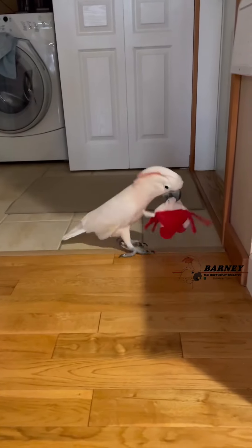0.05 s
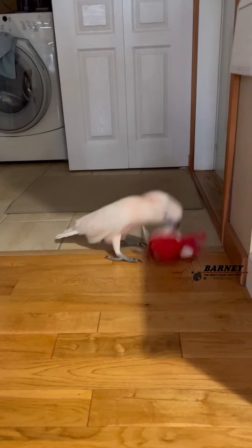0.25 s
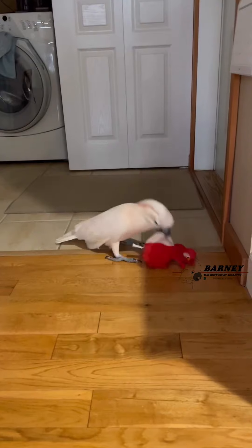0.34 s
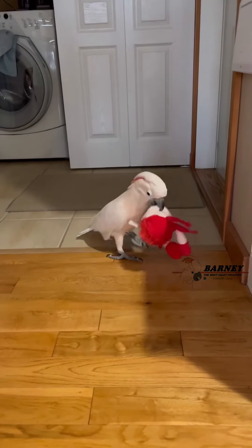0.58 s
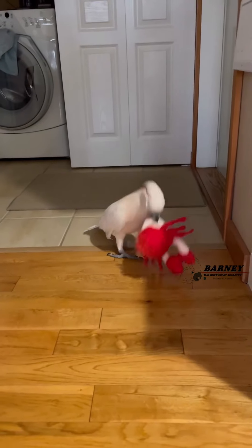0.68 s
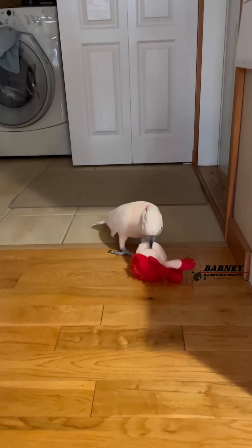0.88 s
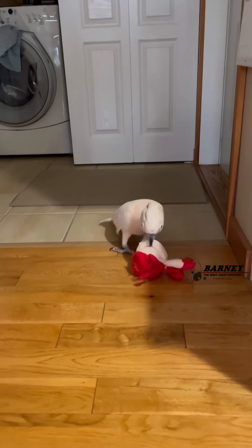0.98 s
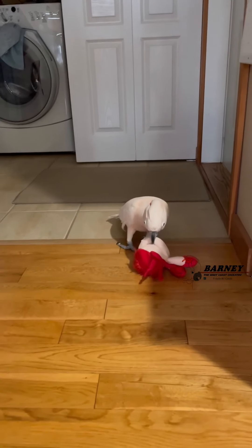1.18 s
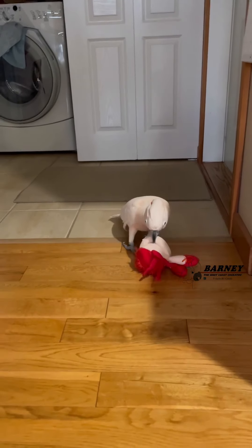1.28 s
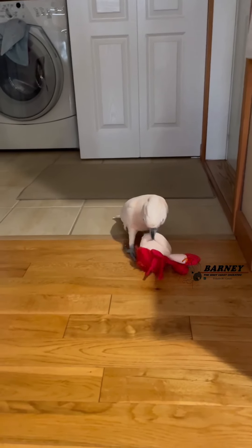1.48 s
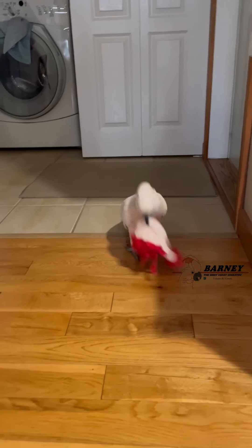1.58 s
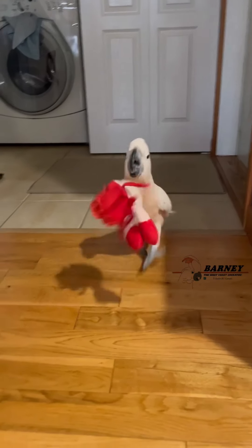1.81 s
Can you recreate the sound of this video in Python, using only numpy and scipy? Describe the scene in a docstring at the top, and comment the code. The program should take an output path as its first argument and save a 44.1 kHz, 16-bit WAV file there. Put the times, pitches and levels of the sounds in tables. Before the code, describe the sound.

A plush toy swung by a bird thumps twice on a hardwood floor. After tiny squeaks and rustling in the first 0.2 seconds, it lands with a loud crack and short boom at 0.25. Ticks precede a softer, duller hit at 0.8. From 1.1 to 1.8 seconds come faint low bumps and beak and claw scuffs, ending in a barely audible squeak. A low room hum lies underneath.

```python
"""A plush toy, swung down twice by a cockatoo, strikes a hardwood floor in a small room.
Each impact excites the damped modes of the boards: a hard part of the toy cracks and the floor booms.
A few tiny squeaks come first; beak and claws tick and scuff on the toy, and plush and feathers rustle.
Near the end the bird shifts its weight with soft bumps and lifts the toy with a faint squeak.
A low room hum and a deep rumble lie underneath."""
import sys
import numpy as np
from scipy import signal
from scipy.fft import rfft, irfft, next_fast_len
from scipy.io import wavfile
from scipy.ndimage import map_coordinates

SR = 44100
rng = np.random.default_rng(int(sys.argv[2]) if len(sys.argv) > 2 else 0)


def put_to_file(sound):
    """Save the sound as 16-bit audio at rate SR, in the file named by the first command-line argument."""
    columns = np.atleast_2d(sound).T  # one column per channel
    safe = np.clip(columns, -1, 1)
    whole_steps = np.round(safe * 32767)
    wavfile.write(sys.argv[1], SR, whole_steps.astype(np.int16))


N = 81585


def amp(db):
    """Amplitude ratio of a level in decibels."""
    return 10 ** (np.asarray(db) / 20)


def unit(x):
    """Normalisation to rms 1."""
    return x / np.sqrt(np.mean(x ** 2) + 1e-20)


def along(points, hz):
    """Interpolation of (f/Hz, value) points on a logarithmic frequency axis."""
    f, v = np.transpose(points)
    return np.interp(np.log(hz + 1), np.log(f + 1), v)


def since(s):
    """Time in seconds since the instant s, for every sample."""
    return np.arange(N) / SR - s


def curve(rows):
    """Linear interpolation of (t/s, value) points, for every sample."""
    return np.interp(since(0), *np.transpose(rows))


def wobble(rate):
    """Random modulation: a spline through rate Gaussian values a second."""
    return map_coordinates(rng.standard_normal(N // 8), [np.arange(N) * rate / SR], mode="wrap")


def filtered(x, response):
    """Linear filtering: the spectrum of x times a frequency response."""
    size = next_fast_len(N + SR // 4)
    return irfft(rfft(x, size) * response(np.fft.rfftfreq(size, 1 / SR)), size)[..., :N]


def noise(colour_db):
    """Coloured noise of rms 1; colour_db gives the relative level at each frequency."""
    return unit(filtered(rng.standard_normal(N), lambda hz: amp(colour_db(hz))))


def diffuse(colour):
    """Diffuse field: stereo noise of rms 1, most alike in both channels at long wavelengths."""
    # side level relative to mid (f/Hz, level/dB)
    width = [(100, -30), (200, -19), (380, -14), (700, -6), (2000, -6), (5000, -5), (12000, -6)]
    response = lambda hz: amp([along(colour, hz), along(colour, hz) + along(width, hz)])
    mid, side = filtered(rng.standard_normal((2, N)), response)
    return unit(np.array([mid + side, mid - side]))


def in_room(x, room_db):
    """Reverberation: early reflections and an exponentially decaying tail follow the direct sound."""
    # reverberation time (f/Hz, T60/s)
    room_t60 = [(80, 0.81), (300, 0.81), (800, 0.69), (2500, 0.47), (5000, 0.53), (8000, 0.33),
                (13000, 0.11)]
    build_s, early_db, early_t60_s = 0.0028, 9, 0.12
    field = diffuse([(1, 0), (SR, 0)])[:, :SR * 3 // 4]
    hz, t, spectra = signal.stft(field, SR, nperseg=256)
    decay = amp(-60 * t / along(room_t60, hz)[:, None]) + amp(early_db - 60 * t / early_t60_s)
    tail = signal.istft(spectra * decay, SR, nperseg=256)[1]
    tail *= 1 - np.exp(-(np.arange(tail.shape[1]) / SR / build_s) ** 2)
    tail /= np.linalg.norm(tail[0])
    return x + amp(room_db) * signal.fftconvolve(np.atleast_2d(x), tail, axes=1)[:, :N]


def burst(s, rise, t60):
    """Transient envelope: a Gaussian rise to the peak at s, then exponential decay."""
    t = since(s)
    return np.exp(-(np.minimum(t, 0) / rise) ** 2) * amp(-60 * np.maximum(t, 0) / t60)


def background():
    """Ambient noise in a diffuse field: a steady room hum and a deep rumble that comes and goes."""
    # spectra of hum and rumble (f/Hz, relative level/dB)
    hum_colour = [(30, -37), (70, -2.5), (100, 4.5), (150, -8.5), (220, -5), (340, -3.5), (520, -14.5),
                  (1000, -19.5), (2500, -37.5), (6000, -45), (9000, -47.5), (12500, -54), (16000, -62)]
    rumble_colour = [(15, -33), (35, -20.5), (52, -6), (90, -6.5), (130, -21), (300, -29), (1000, -83.5)]
    # envelope of the rumble (t/s, level/dB)
    rumble_levels = [(0, -63), (.3, -55), (.58, -49), (.7, -60), (.9, -49), (1.05, -65), (1.12, -49),
                     (1.2, -49), (1.29, -59.5), (1.55, -62.5), (1.72, -59), (1.77, -49), (1.84, -46)]
    hum_db = -54.5
    return amp(hum_db) * diffuse(hum_colour) + amp(curve(rumble_levels)) * diffuse(rumble_colour)


def rustle():
    """Friction noise of plush and feathers, made grainy by random amplitude modulation."""
    # envelopes of the rustle and of the thin, high feather hiss (t/s, level/dB)
    rustle_levels = [(0, -43.5), (.08, -46.5), (.13, -50.5), (.2, -49.5), (.26, -37), (.5, -63), (.54, -55),
                     (.6, -63), (.72, -53.5), (.95, -62), (1.22, -69.5), (1.4, -59), (1.6, -66),
                     (1.85, -65)]
    hiss_levels = [(0, -68.5), (.9, -76), (1.25, -83), (1.3, -69), (1.42, -77.5), (1.55, -70.5),
                   (1.67, -67.5), (1.85, -73.5)]
    # their spectra (f/Hz, relative level/dB)
    rustle_colour = [(200, 13.5), (600, 6.5), (1400, 0), (2600, 4.5), (4000, -1.5), (6200, -4), (8500, -20),
                     (12500, -33), (16000, -32.5)]
    hiss_colour = [(2000, -16), (6000, 6), (9000, -9.5), (13000, 3), (16000, -12)]
    grain_db, grains_per_s = 1.5, 360
    grainy = lambda colour: unit(diffuse(colour) * amp(grain_db * wobble(grains_per_s)))
    rustling = amp(curve(rustle_levels)) * grainy(rustle_colour)
    hiss = amp(curve(hiss_levels)) * grainy(hiss_colour)
    return rustling + hiss


def squeaks():
    """Tiny squeaks: a tone and its second harmonic, roughened by frequency jitter and a noisy rasp."""
    # squeaks (peak t/s, rise/s, f/Hz, glide/(octave/s), level/dB)
    events = [(.012, 0.0068, 3720, 0, -40.5), (.013, 0.0027, 5800, 0.5, -43),
              (.018, 0.019, 2560, -0.5, -43), (.051, 0.0045, 3020, -0.5, -34.5),
              (.077, 0.0092, 2980, 9.5, -35), (.161, .007, 3260, -16.5, -37.5),
              (.188, 0.0043, 3346, 6.5, -38)]
    # spectrum of the rasp (f/Hz, relative level/dB)
    rasp_colour = [(500, -26.5), (1600, -17.5), (2300, 1), (3500, -12), (4500, -10), (6200, -12),
                   (8000, -23.5), (15000, -44)]
    jitter_fraction, jitter_per_s = .062, 1300
    overtone_db, rasp_db = -19.5, -7
    out = np.zeros(N)
    for s, rise, hz, glide, db in events:
        t = np.clip(since(s), -4 * rise, rise)  # the pitch glides only around the peak
        pitch = hz * 2 ** (glide * t) * (1 + jitter_fraction * wobble(jitter_per_s))
        phase = 2 * np.pi * np.cumsum(pitch) / SR
        tone = np.sqrt(2) * (np.sin(phase) + amp(overtone_db) * np.sin(2 * phase))
        rasp = amp(rasp_db) * noise(lambda f: along(rasp_colour, f))
        out += amp(db) * burst(s, rise, t60=.016) * (tone + rasp)
    return in_room(out, room_db=-10)


def clicks():
    """Impulsive excitation: brief, hard contacts of beak and toy radiate broadband cracks."""
    # contacts (t/s, level/dB, T60/s, tilt above 300 Hz/(dB/octave))
    contacts = [(0.0235, -36, 0.0067, 0.5), (0.175, -38.5, 0.016, 2), (0.185, -34, 0.034, 2),
                (0.19, -45, 0.011, -5), (0.2213, -30, 0.014, 10), (0.2453, -14.5, 0.033, -2),
                (0.2503, -15.5, 0.019, 8.5), (0.6526, -37.5, 0.053, 6), (.659, -35.5, 0.066, -1.5),
                (0.733, -44, 0.0093, 4), (.7935, -35, 0.027, -3.5), (0.8052, -29.5, 0.014, -0.5),
                (0.8143, -34.5, 0.047, -3.5), (1.2842, -46.5, 0.034, -3)]
    # spectrum of a crack before the tilt (f/Hz, relative level/dB)
    colour = [(150, -26), (500, -2), (1100, 1.5), (2000, -3), (3000, 1.5), (5300, -5), (7000, -3.5),
              (9500, -20.5), (12000, -6), (16000, -34)]
    out = np.zeros(N)
    for s, db, t60, tilt in contacts:
        crack = noise(lambda hz: along(colour, hz) + tilt * np.log2(np.maximum(hz, 300)))
        out += amp(db) * burst(s, rise=0.00011, t60=t60) * crack
    return in_room(out, room_db=-6)


def scuffs():
    """Resonant filtering: each rub or snap of beak, claws and toy is noise in one broad resonance."""
    # rubs and snaps (t/s, level/dB, rise/s, T60/s, centre f/Hz, half-width/octave)
    rubs = [(0.2237, -33.5, 0.0012, 0.012, 668, 0.22), (0.238, -37.5, 0.0065, .03, 650, 0.29),
            (0.2459, -19.5, 0.00038, 0.022, 1148, 0.27), (.251, -23.5, 0.00083, .03, 5210, 0.17),
            (.805, -26.5, 0.00053, 0.019, 4970, 0.59), (1.412, -59, 0.0055, .05, 2920, 0.36),
            (1.425, -40, 0.00042, 0.014, 1510, 0.43), (1.458, -50, 0.0014, 0.019, 7000, .35),
            (1.572, -57, 0.0017, 0.018, 11400, 0.25), (1.652, -60, 0.0018, 0.016, 12100, .3),
            (1.681, -50.5, 0.0086, 0.075, 2690, 0.64), (1.686, -53, 0.0087, 0.07, 1220, 0.23)]
    out = np.zeros(N)
    for s, db, rise, t60, centre, width in rubs:
        rub = noise(lambda hz: -20 * np.log10(1 + (np.log2((hz + 1) / centre) / width) ** 4 / 2))
        out += amp(db) * burst(s, rise, t60) * rub
    return in_room(out, room_db=-7)


def thumps():
    """Modal vibration: each landing of the toy rings the boards, then the wider floor booms."""
    # landings, the softer one duller (t/s, level/dB, tilt about 200 Hz/(dB/octave))
    landings = [(.2462, -7, -0.5), (0.7971, -24.5, -8)]
    # floorboard modes (f/Hz, relative level/dB, T60/s)
    modes = [(74.4, -23, 0.4), (99.8, -7.5, 0.29), (140, -1.5, 0.076), (196.3, 0, 0.093),
             (256, -11.5, 0.099), (300, 3.5, 0.13), (352.5, -26, 0.55), (388.5, -2.5, 0.083),
             (552, -13, 0.1), (610, -9.5, 0.055), (695, -4.5, 0.061), (952, -15, .09), (1123, -17.5, 0.11),
             (1250, -17, 0.064), (1316, -17.5, 0.064), (1520, -23.5, 0.077)]
    # spectrum of the boom before the tilt (f/Hz, relative level/dB)
    boom_colour = [(25, -24.5), (60, -3.5), (100, -1), (150, -7), (210, -2.5), (290, 4.5), (400, -8),
                   (550, -16), (1000, -22), (3000, -52.5)]
    attack_s, spread_rad, full_spread_hz = 0.0032, .25, 450
    boom_db, boom_delay_s, boom_t60_s = -14, 0.012, 0.48
    left_right = np.array([[1], [-1]])
    out = np.zeros((2, N))
    for s, db, tilt in landings:
        t = np.maximum(since(s), 0)
        ring = 0
        for k, (hz, level, t60) in enumerate(modes):
            # a phase difference between the channels gives each mode its own direction
            phase = spread_rad * min(hz / full_spread_hz, 1) * rng.standard_normal() * left_right
            decay = amp(level + tilt * np.log2(hz / 200) - 60 * t / t60)
            polarity = (-1) ** k  # neighbouring modes swing opposite ways
            ring += polarity * decay * np.sin(2 * np.pi * hz * t + phase)
        ring *= amp(db) * (1 - np.exp(-t / attack_s))
        boom = diffuse([(hz, level + tilt * np.log2(hz / 200)) for hz, level in boom_colour])
        boom *= amp(db + boom_db) * burst(s + boom_delay_s, boom_delay_s / 2, boom_t60_s)
        out += in_room(ring, room_db=-14.5) + boom
    return out


def bumps():
    """Slow forcing: soft pushes excite only the lowest resonance of the floor."""
    # the bird shifts its weight and lifts the toy (t/s, level/dB)
    pushes = [(1.11, -46), (1.18, -43), (1.78, -50), (1.825, -40.5)]
    floor_hz = 53.9
    return sum(amp(db) * burst(s, rise=0.0092, t60=0.21) * np.sin(2 * np.pi * floor_hz * since(s))
               for s, db in pushes)


def lift_squeak():
    """A pure tone under a Gaussian envelope: the faint, thin squeak as the toy is lifted."""
    peak_s, half_width_s, pitch_hz, level_db = 1.795, 0.022, 3540, -68
    t = since(peak_s)
    return amp(level_db) * np.exp(-(t / half_width_s) ** 2) * np.sin(2 * np.pi * pitch_hz * t)


def scene():
    """Superposition: the sound pressures of floor, toy, bird and room add."""
    return thumps() + bumps() + clicks() + scuffs() + squeaks() + lift_squeak() + rustle() + background()


def record(dry):
    """Stereo pickup: two ports differ in level and phase; low cut, saturation and band limit follow."""
    # left port minus right port (f/Hz, level/dB)
    balance = [(60, 0), (110, .5), (200, 1.5), (650, 1.8), (1200, -2.4), (2400, 0), (4400, -1), (8000, 0)]
    # lead of the left port over the right (f/Hz, phase/rad)
    lead = [(100, 0), (5000, .1), (6800, 1.4), (8200, 2.7), (9500, 3.14), (10800, 3.5), (12400, 5.1),
            (14300, 6.3)]
    low_cut_hz, top_hz, ceiling = 23, 16400, .95

    def response(hz):
        """Transfer function: each port takes half of the difference, then a first-order high-pass."""
        gain = amp(np.outer([.5, -.5], along(balance, hz)))
        phase = np.outer([.5, -.5], along(lead, hz))
        return gain * np.exp(1j * phase) * 1j * hz / (1j * hz + low_cut_hz)

    x = filtered(dry, response)
    x = x / (1 + np.abs(x / ceiling) ** 6) ** (1 / 6)  # soft clipping
    return filtered(x, lambda hz: hz < top_hz)


dry = scene()
out = record(dry)
put_to_file(out)
```